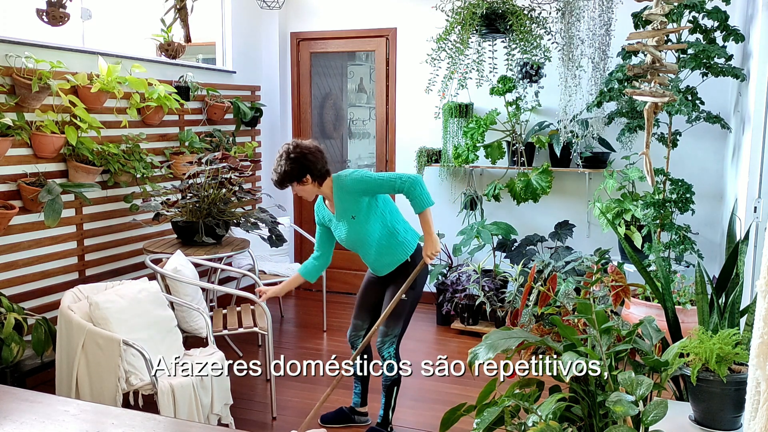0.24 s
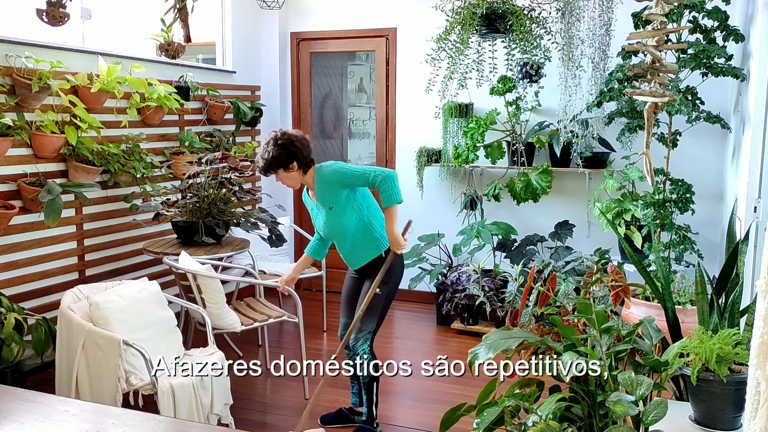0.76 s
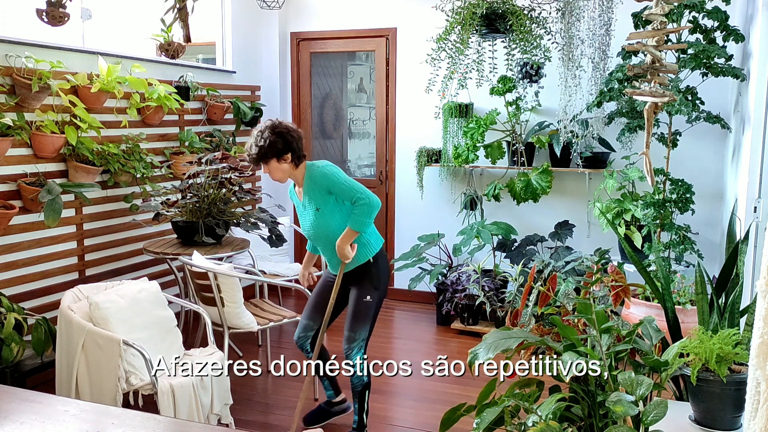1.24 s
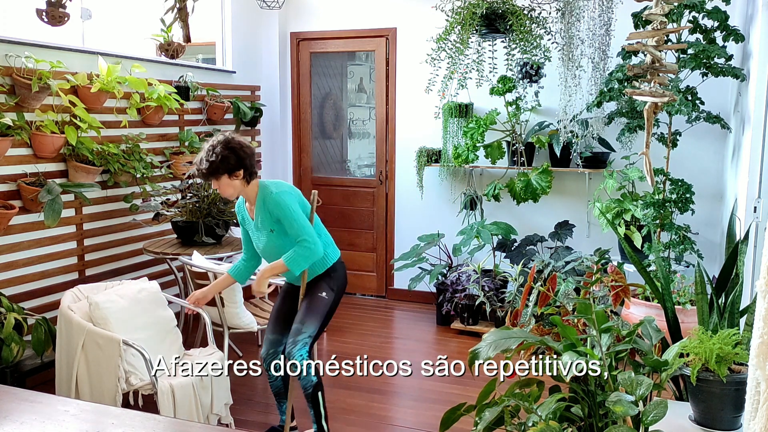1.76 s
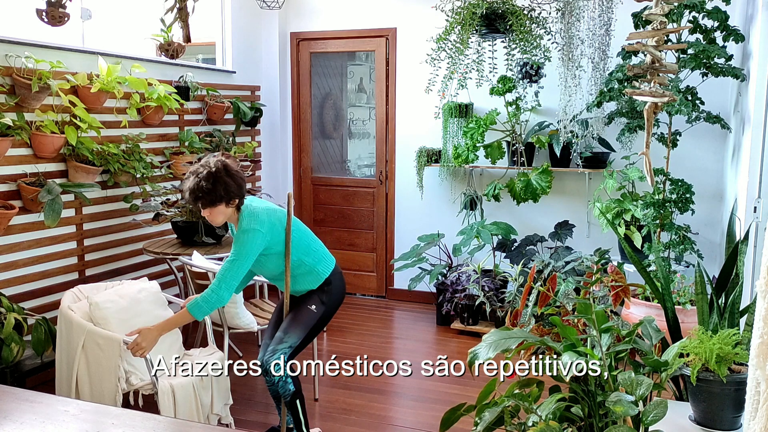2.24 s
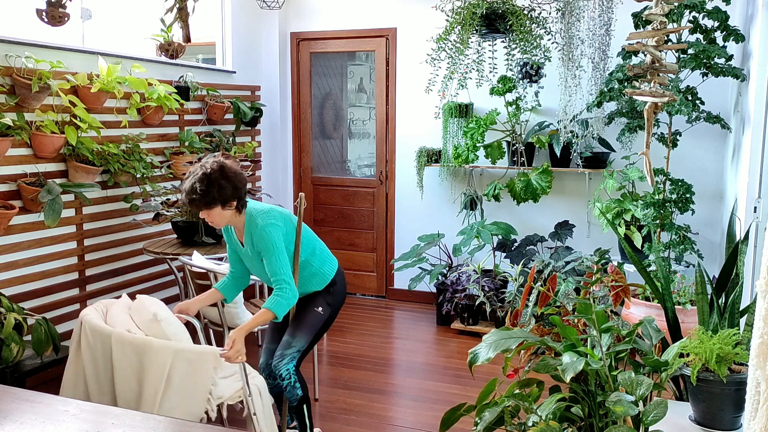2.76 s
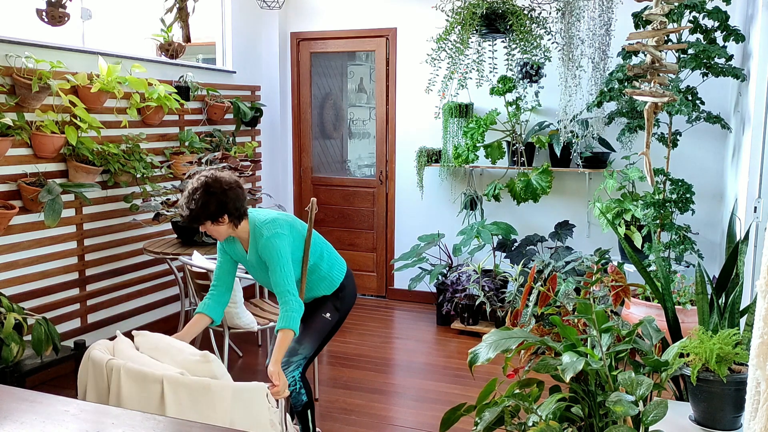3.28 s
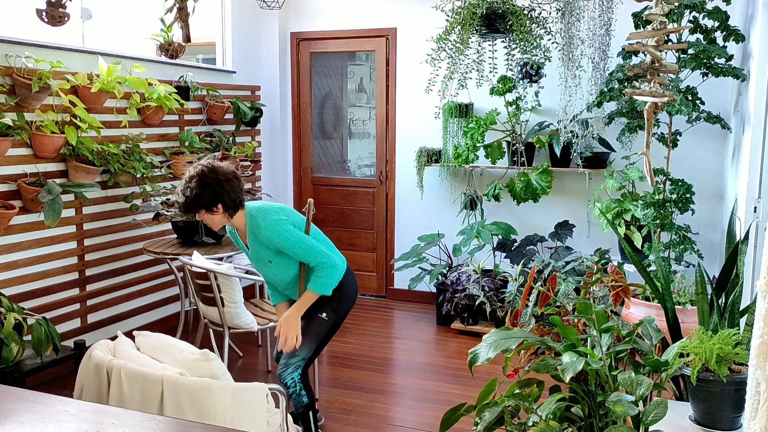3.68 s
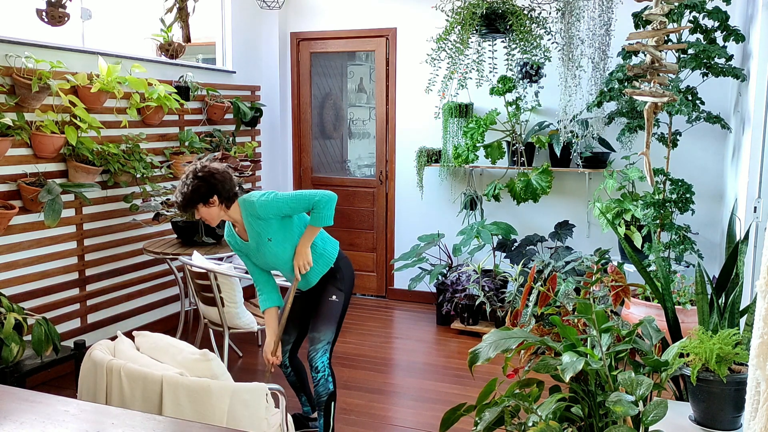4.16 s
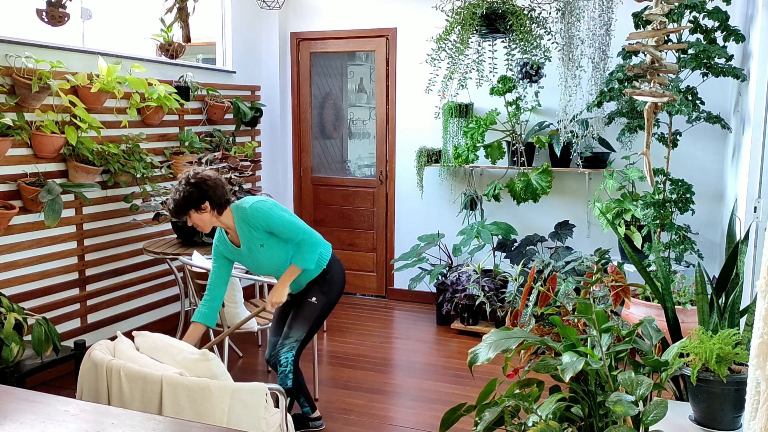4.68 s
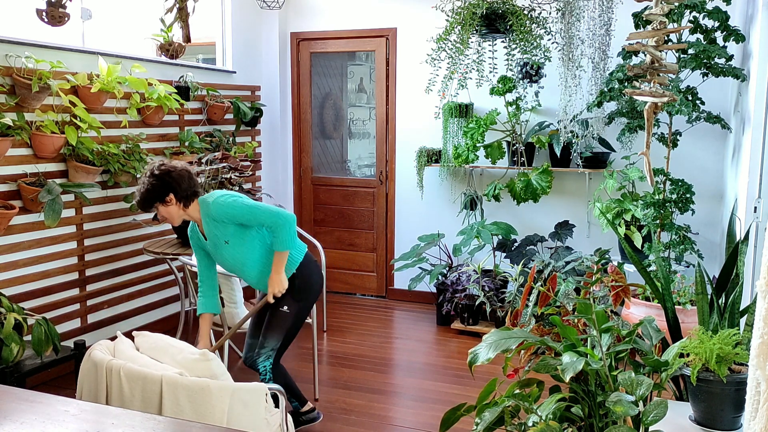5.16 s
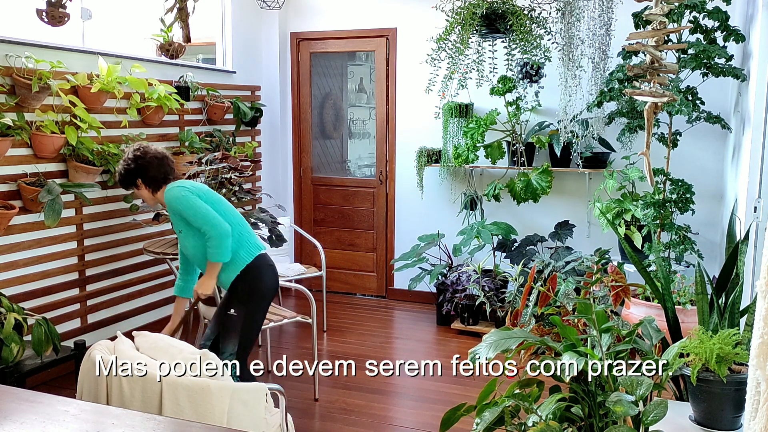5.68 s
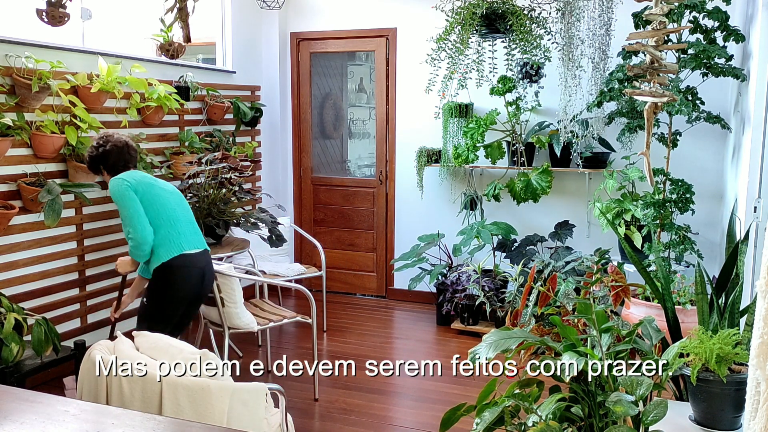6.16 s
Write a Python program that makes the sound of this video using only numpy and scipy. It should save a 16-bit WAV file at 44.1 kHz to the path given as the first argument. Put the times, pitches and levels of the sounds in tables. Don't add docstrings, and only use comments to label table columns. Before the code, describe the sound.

Sparse wooden knocks, a short chair-leg groan, bright metal ticks and soft bristle strokes ring in a lively room with a low distant drone.

```python
import sys
import numpy as np
from scipy import signal
from scipy.fft import rfft, irfft
from scipy.io import wavfile
from scipy.ndimage import uniform_filter1d

SR = 44100
rng = np.random.default_rng(int(sys.argv[2]) if len(sys.argv) > 2 else 0)


def generate_wav(sig):
    pcm = np.round(np.clip(np.atleast_2d(sig).T, -1, 1) * 32767).astype(np.int16)
    wavfile.write(sys.argv[1], SR, pcm)


def linear_from_db(decibels):
    return 10 ** (np.asarray(decibels, float) / 20)


N = 283665


def read(points, hz):
    point_hz, value = np.transpose(points)
    return np.interp(np.log(hz + 1), np.log(point_hz + 1), value)


def evened(x):
    return x / np.sqrt(np.mean(x ** 2) + 1e-20)


def summed_db(levels_db):
    return 10 * np.log10(sum(linear_from_db(db) ** 2 for db in levels_db) + 1e-20)


def arch_db(t, middle_s, half_s):
    return -6 * ((t - middle_s) / half_s) ** 2


def add(mix, start_s, sound):
    part = mix[:, round(start_s * SR):][:, :sound.shape[1]]
    part += sound[:, :part.shape[1]]


def contact(length_s, sharp, grit_db=3.5):
    t = np.arange(4000) / SR / max(length_s, .0005)
    grit = rng.standard_normal(len(t)) * linear_from_db(grit_db * rng.exponential(1, len(t)))
    slide = grit * t * np.exp(-t)
    sharp = np.clip(sharp, 0, 1)
    force = np.sqrt(1 - sharp) * slide / np.linalg.norm(slide)
    force[0] = np.sqrt(sharp)
    return force


def body(points):
    hz = np.fft.rfftfreq(8192, 1 / SR)
    log_gain = np.log(linear_from_db(np.maximum(read(points, hz), -70)))
    circle = np.r_[log_gain, log_gain[-2:0:-1]]
    taps = np.fft.ifft(np.exp(np.conj(signal.hilbert(circle)))).real[:2048]
    return taps / np.linalg.norm(taps)


def strike(force, parts):
    return sum(linear_from_db(db) * signal.fftconvolve(force, taps) for db, taps in parts)


def paired(z, hz):
    # freq_hz, correlation
    likeness = [(60, 0.91), (130, 0.81), (290, 0.89), (640, 0.34), (1200, -0.041), (2500, -0.14),
                (5000, 0.34), (9000, 0.45), (15000, 0.85)]
    same = np.clip(read(likeness, hz), -1, 1)[:, None]
    return np.array([z[0], same * z[0] + np.sqrt(1 - same ** 2) * z[1]])


def room(direct_db, build_s=0.0066):
    # freq_hz, t60_s
    decay = [(80, 0.44), (250, 0.41), (700, 0.42), (2000, 0.53), (5000, 0.57), (9000, 0.38), (14000, 0.45)]
    length = SR // 2
    taps = np.zeros((2, length))
    at = np.arange(100, length - 16, 16) + rng.integers(0, 16, (2, (length - 101) // 16))
    echoes = rng.choice([-1., 1.], at.shape) * linear_from_db(3.43 * rng.standard_normal(at.shape))
    np.put_along_axis(taps, at, echoes, 1)
    taps *= 1 - np.exp(-np.arange(length) / SR / max(build_s, .001))
    hz, t, z = signal.stft(taps, SR, nperseg=512)
    z = paired(z, hz) * linear_from_db(-60 * t / read(decay, hz)[:, None])
    tail = signal.istft(z, SR, nperseg=512)[1]
    tail /= np.linalg.norm(tail[0])
    tail[:, 0] += linear_from_db(direct_db)
    early = rng.integers(20, 90, 2).repeat(2) + [0, 6, 6, 0]
    tail[[0, 1, 0, 1], early] += linear_from_db(direct_db - 3)
    return tail


def knocks():
    # start_s, boards_db, slats_db, sharpness (0-1), left_right_db
    sharp_knocks = [(0.606, -19, -22.5, 0.22, -2.5), (1.172, -11.5, -25, 0.26, 0.5),
                    (1.196, -17.5, -35, 0.72, 0.5), (1.239, -25.5, -51, 0.6, 1),
                    (1.523, -35, -36.5, 0.6, 0), (1.99, -32, -40.5, 0.3, -1), (2.304, -22, -27.5, 0.12, -1),
                    (3.311, -15, -22.5, 0.06, -1.5), (3.399, -9.5, -20.5, 1, -2),
                    (4.876, -20, -30, 0.4, 0.5), (4.995, -16.5, -23.5, 0, -2),
                    (5.041, -19, -26.5, 0.15, -1.5)]
    # start_s, boards_db, slats_db, left_right_db
    landings = [(0.566, -27.5, -37.5, -1), (0.626, -19.5, -23.5, 2), (1.076, -27.5, -37, 0),
                (1.634, -36, -52, 2), (3.372, -4.5, -16, 0), (3.796, -38.5, -36, 2), (4.943, -17, -23, 0.5),
                (4.963, -21.5, -30.5, 0.5), (5.075, -33, -29, 2), (5.236, -36, -54, 0),
                (5.828, -32.5, -58, 1)]
    # freq_hz, level_db
    board_colour = [(40, -53.5), (100, -30), (170, -15.5), (260, -5.5), (330, -0.5), (430, -1), (600, -3),
                    (1000, -10), (1600, -24.5), (3000, -59), (8000, -69.5)]
    # freq_hz, level_db
    slat_colour = [(200, -38), (500, 3), (740, 6), (860, 2), (990, 3), (1150, 0.5), (1340, 2.5),
                   (1480, -4.5), (1620, 0), (1900, -8), (2600, -14.5), (4000, -29.5), (9000, -66.5)]
    knock_s, landing_s, landing_sharp = 0.0059, 0.0071, 0.028
    out, boards, slats = np.zeros((2, N)), body(board_colour), body(slat_colour)
    rows = [(s, low, mid, knock_s, sharp, lean) for s, low, mid, sharp, lean in sharp_knocks]
    rows += [(s, low, mid, landing_s, landing_sharp, lean) for s, low, mid, lean in landings]
    for start_s, boards_db, slats_db, length_s, sharp, lean_db in rows:
        force = contact(length_s, sharp)
        blow = strike(force, [(boards_db + 27.0, boards), (slats_db + 30.5, slats)])
        sides = linear_from_db([[lean_db / 2], [-lean_db / 2]])
        add(out, start_s, sides * signal.fftconvolve(blow[None], room(-9.0), axes=1))
    return out


def ticks():
    # start_s, frame_db, tube_db, bright_edge_db
    metal_ticks = [
        (0.545, -37, -41, -47),
        (0.6014, -27, -29.5, -34),
        (1.169, -36.5, -42, -48),
        (1.524, -45, -56, -50.5),
        (1.992, -45.5, -61, -56),
        (2.2997, -22.5, -16, -22.5),
        (3.315, -30.5, -41, -43),
    ]
    # start_s, frame_db, tube_db, bright_edge_db, contact_length_s
    scuffs = [(0.624, -38, -43, -59, 0.014), (1.188, -45, -57, -51, 0.0081), (1.551, -43, -55, -53, 0.018),
              (3.365, -22.5, -34.5, -39, 0.0043), (3.793, -43.5, -46.5, -50.5, 0.0097),
              (4.383, -58, -72, -69, 0.01), (4.6684, -45, -64, -67, 0.0058),
              (4.8696, -30.5, -54, -44, 0.012), (4.9412, -18, -34.5, -39, 0.008),
              (4.963, -23.5, -44, -51, 0.009), (4.993, -24, -60, -62, 0.007),
              (5.053, -29, -61, -63, 0.0048), (5.657, -41.5, -49, -49, 0.0091),
              (6.1925, -41, -52, -45, 0.05)]
    # freq_hz, level_db
    frame_colour = [(800, -1), (1800, 2.5), (2500, 10), (3300, 7), (4300, 7), (5000, 3), (5500, -8.5),
                    (6500, 4.5), (7500, -30.5), (11000, -22)]
    # freq_hz, level_db
    tube_colour = [(3500, -69), (4700, -18), (5200, -7), (5900, -7), (6300, -9), (7000, 1), (7600, -1.5),
                   (8000, 1), (9000, 8.5), (9300, -8.5), (10500, -27), (16000, -64)]
    # freq_hz, level_db
    edge_colour = [(5290, -45.5), (9000, 2.5), (9420, -8), (9530, -4), (9780, -4), (11800, -9),
                   (14400, -12), (15700, -47), (15900, -103)]
    # freq_hz, left_right_db
    lean_points = [(2000, -2), (4400, 0), (6500, -1.5), (8100, -11.5), (9500, -9), (11500, 16), (15000, -9)]
    tick_s, tick_sharp, scuff_sharp = 0.0029, 0.68, .2
    out = np.zeros((2, N))
    frame, tube, edge = body(frame_colour), body(tube_colour), body(edge_colour)
    rows = [(*row, tick_s, tick_sharp) for row in metal_ticks]
    rows += [(*row, scuff_sharp) for row in scuffs]
    for start_s, frame_db, tube_db, edge_db, length_s, sharp in rows:
        force = contact(length_s, sharp)
        tick = strike(force, [(frame_db + 24, frame), (tube_db + 30.5, tube), (edge_db + 31, edge)])
        add(out, start_s, signal.fftconvolve(tick[None], room(-15.0, build_s=0.0085), axes=1))
    lean = linear_from_db(read(lean_points, np.fft.rfftfreq(N, 1 / SR)) / 2)
    return irfft(rfft(out) * [lean, 1 / lean], N)


def drag():
    # middle_s, half_length_s, pressure_db
    pulls = [
        (0.722, 0.032, -27.5),
        (0.775, 0.037, -24),
        (0.832, 0.041, -23),
        (0.886, 0.026, -23.5),
        (0.983, 0.038, -20.5),
    ]
    # freq_hz, width_hz, level_db
    leg_modes = [(270, 19, -12.5), (297, 16, -6), (382.4, 25, 3.5), (400, 40, -2), (587, 49, -8),
                 (740, 97, -15)]
    slips_per_s = 480
    t = np.arange(N) / SR
    pressure_db = summed_db(db + arch_db(t, s, half_s) for s, half_s, db in pulls)
    slips = (rng.random(N) < slips_per_s / SR) * linear_from_db(2.0 * rng.standard_normal(N))
    ring_s = t[:4000]
    groan = sum(linear_from_db(db) * np.sin(2 * np.pi * hz * ring_s) * np.exp(-np.pi * width_hz * ring_s)
                for hz, width_hz, db in leg_modes)
    judder = signal.oaconvolve(slips * linear_from_db(pressure_db - 18.5), groan)
    judder = signal.sosfilt(signal.butter(4, 200, "high", fs=SR, output="sos"), judder)
    return signal.oaconvolve(judder[None], room(6.55), axes=1)[:, :N]


def wash(size, colour_db, patchy_db):
    hz, frames = np.fft.rfftfreq(size, 1 / SR), 4 * N // size + 5
    a, b, c, d, patches = rng.standard_normal((frames, len(hz), 5)).T
    patches = evened(uniform_filter1d(uniform_filter1d(patches, 8, 0), 12, 1))
    z = paired([a + 1j * b, c + 1j * d], hz)
    z *= linear_from_db(colour_db(hz, np.arange(frames) * size / 4 / SR) + patchy_db * patches)
    return signal.istft(z, nperseg=size, noverlap=3 * size // 4)[1][:, :N]


def brush():
    # freq_hz, level_db
    bristles = [(1200, -21), (2000, -13.5), (3500, -12), (5000, -11.5), (6600, -8), (7400, -12),
                (8700, -4.5), (9700, -4), (10500, -3.5), (12000, -7), (14000, -13.5), (16000, -12)]
    # start_s, length_s, level_db, dullness_db (added to the lower part)
    strokes = [
        (-.1, 0.2, -54.5, 10),
        (0.303, .3, -57, 4),
        (0.702, 0.36, -45, 11.5),
        (2.184, 0.061, -55, 11),
        (3.304, 0.31, -57, 5),
        (3.99, 0.18, -53, 8),
        (4.465, 0.4, -52.5, 2.5),
        (5.0, 0.56, -49.5, 10),
        (5.597, 0.32, -49.5, 9),
        (6.15, .4, -47.5, 8),
    ]
    rise_db_per_s, fall_db_per_s = 148, 77

    def colour_db(hz, t):
        lower = 1 / (1 + (hz[:, None] / 5500) ** 4)
        strokes_db = (db + lower * dull_db - rise_db_per_s * np.maximum(s - t, 0)
                      - fall_db_per_s * np.maximum(t - s - length_s, 0)
                      for s, length_s, db, dull_db in strokes)
        return read(bristles, hz)[:, None] - 16 + summed_db(strokes_db)
    return wash(size=512, colour_db=colour_db, patchy_db=.7)


def passing(t):
    # nearest_s, half_length_s, rumble_db, drone_db
    passes = [(0, 0.34, -67, -43.5), (.8, 0.18, -78, -39.5), (1.548, 0.45, -66, -44.5),
              (2.87, 0.44, -63, -43), (3.554, .2, -70, -43.5), (3.85, 0.093, -72, -36),
              (4.25, 0.32, -66, -45), (5.0, 0.41, -66, -47), (5.4, 0.25, -71, -50), (5.75, 0.14, -62, -63),
              (6.05, 0.21, -79, -51)]
    far_rumble_db, far_drone_db = -78, -55
    rumbles_db = [db + arch_db(t, s, half_s) for s, half_s, db, _ in passes]
    drones_db = [db + arch_db(t, s, half_s) for s, half_s, _, db in passes]
    return summed_db([far_rumble_db] + rumbles_db), summed_db([far_drone_db] + drones_db)


def drone():
    # pitch_hz, level_db
    tones = [(240, -8), (319, 0), (412, -9)]
    level_db = passing(np.arange(0, N, 64) / SR)[1].repeat(64)[:N]
    out = np.zeros(N)
    for pitch_hz, db in tones:
        swell, drift = (evened(uniform_filter1d(uniform_filter1d(v, size=2000), size=2000))
                        for v in rng.standard_normal((2, N)))
        phase = 2 * np.pi * np.cumsum(pitch_hz + 3.11 * drift) / SR
        out += linear_from_db(level_db + db + 1.0 + 3.1 * swell) * np.sin(phase)
    return out


def modes_db(hz):
    # freq_hz, width_hz, lift_db
    modes = [(105, 7.9, 4.5), (191, 28, 4.5), (241, 17, 7.5), (316, 85, 3.5), (420, 8, 5), (478, 9.6, -5.5),
             (2060, 500, -8.5), (2532, 120, 9.5)]
    return sum(db / (1 + (2 * (hz - mode_hz) / width_hz) ** 2) for mode_hz, width_hz, db in modes)


def traffic():
    # freq_hz, level_db
    hum = [(15, -65.5), (25, -24.5), (102, -7.5), (153, -9.5), (242, -12.5), (284, -11), (317, -7),
           (404, -8.5), (438, -11), (773, -14), (2100, -20.5), (2540, -30.5), (5550, -39), (10100, -39),
           (15900, -40.5)]
    # time_s, level_db
    hum_level = [(0, -40.5), (.9, -39), (1.7, -40), (2.6, -39.5), (3.2, -40.5), (3.6, -39.5), (4.5, -38.5),
                 (5.0, -39), (5.6, -39), (6.43, -38)]

    def colour_db(hz, t):
        hum_db = np.interp(t, *np.transpose(hum_level))
        rumble_db = passing(t)[0]
        deep = 1 / (1 + (hz[:, None] / 75) ** 4)
        colour = (read(hum, hz) + modes_db(hz))[:, None]
        return colour + (1 - deep) * (hum_db - 9.5) + deep * (rumble_db + 11.5)
    return wash(size=4096, colour_db=colour_db, patchy_db=.6)


def scene():
    return knocks() + ticks() + drag() + traffic() + drone() + brush()


def roll_off(x):
    return signal.sosfilt(signal.butter(12, 16080, fs=SR, output="sos"), x)


def record(dry):
    cut = signal.sosfilt(signal.butter(2, 45, "high", fs=SR, output="sos"), dry)
    return roll_off(cut)


dry = scene()
out = record(dry)
generate_wav(out)
```